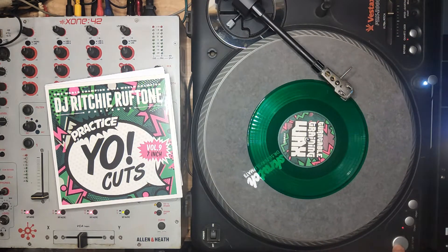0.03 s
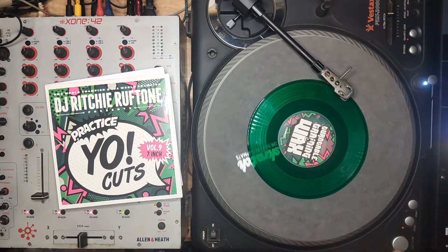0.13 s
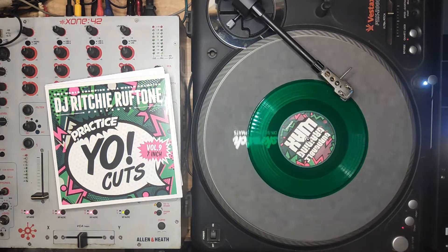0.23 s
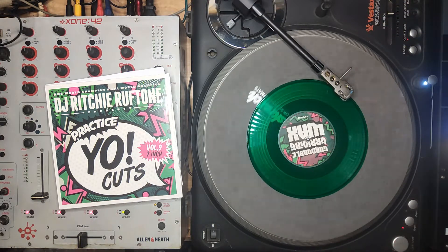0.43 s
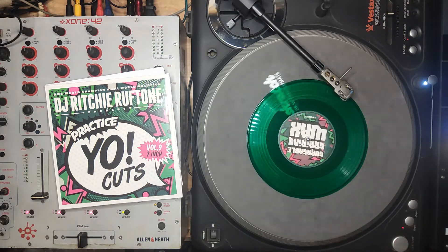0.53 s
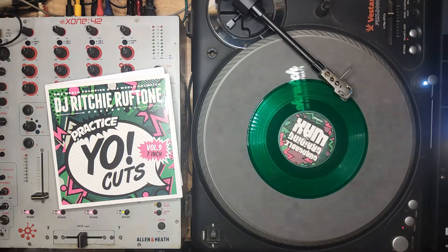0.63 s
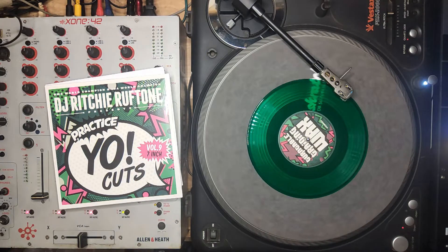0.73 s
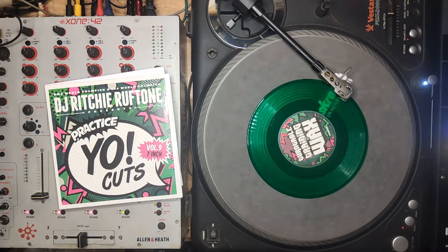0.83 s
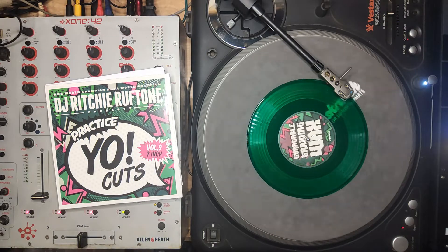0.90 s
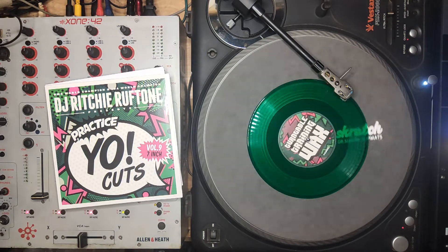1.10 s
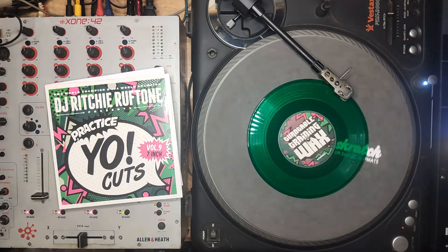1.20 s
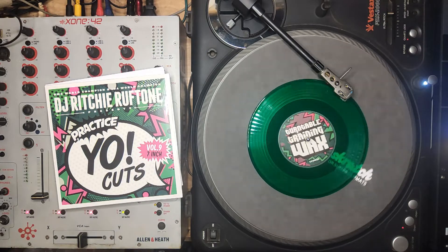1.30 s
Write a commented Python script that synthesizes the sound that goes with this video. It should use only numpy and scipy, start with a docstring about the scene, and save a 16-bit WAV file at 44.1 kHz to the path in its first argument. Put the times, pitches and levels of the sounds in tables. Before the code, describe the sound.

A turntable needle lands on a spinning vinyl record: a soft, low knock at 0.1 seconds, then one sharp, deep thump at 0.2, mostly on the left. Faint, patchy swishes follow on the right until about 1 second. Dust gives a dull pop at 0.4, a quick cluster of small ticks near 0.75 and another tick at 1.3. Quiet rumble and steady hum run underneath, heard straight from the pickup.

```python
"""On a turntable, a needle lands on a spinning vinyl record, heard straight from the pickup.
A soft knock shakes the deck, then the needle drops into the groove with one sharp, deep thump,
mostly on the left. The groove holds no music: there is low rumble and mains hum, worn patches
swish on the right wall, and a few specks of dust tick as they flick the needle."""
import sys
import numpy as np
from scipy.fft import rfft, irfft, next_fast_len
from scipy.io import wavfile

SR = 44100
rng = np.random.default_rng(int(sys.argv[2]) if len(sys.argv) > 2 else 0)


def generate_wav(sig):
    """Save sig (samples, or channels by samples) to the path in sys.argv[1] as 16-bit PCM at SR."""
    pcm = np.round(np.clip(np.atleast_2d(sig).T, -1, 1) * 32767).astype(np.int16)
    wavfile.write(sys.argv[1], SR, pcm)


N = 59535
T = np.arange(N) / SR
SIZE = next_fast_len(2 * N)   # extra room, so filter tails do not wrap around
HZ = np.arange(SIZE // 2 + 1) * SR / SIZE

# The needle's landing, left channel then right; gains are before filtering:
# (time [s], push gain [dB], snap gain [dB], crack gain [dB], treble cutoff [Hz], bass cutoff [Hz])
LANDING = [(0.20174, 45.5, 16.5, -17.5, 3126, 36), (0.20159, 39.5, -2, -26, 2500, 17)]


def from_db(db):
    """Turn decibels into a gain."""
    return 10 ** (np.asarray(db) / 20)


def gain_curve(points):
    """A gain that moves through (time [s], level [dB]) points."""
    return from_db(np.interp(T, *np.transpose(points)))


def low_pass(hz):
    """A gentle filter that keeps what is below hz; one minus it keeps what is above."""
    return 1 / (1 + 1j * HZ / hz)


def bass_delay(hz):
    """A filter that delays what is below hz and changes no levels."""
    return 1 - 2 * low_pass(hz)


def click(time, response):
    """One click, sent through a filter."""
    return irfft(response * np.exp(-2j * np.pi * HZ * time), SIZE)[:N]


def noise(spectrum):
    """Noise shaped by (frequency [Hz], level [dB per Hz]) points."""
    hz, db = np.transpose(spectrum)
    gain = from_db(np.interp(np.log(HZ + 1), np.log(hz), db)) * np.sqrt(SR / 2)
    return irfft(rfft(rng.standard_normal(SIZE)) * gain, SIZE)[:N]


def pickup(sideways, vertical):
    """Sideways needle motion reaches both channels alike, vertical motion with opposite signs."""
    return np.array([sideways + vertical, sideways - vertical])


def hum():
    """The mains and the motor add steady low tones."""
    # Hum tones: (frequency [Hz], sideways level [dB rms], vertical level [dB rms])
    tones = [(53.6, -59, -56.5), (101.8, -67.5, -66.5), (188, -86, -80), (308, -91, -88)]
    out = 0
    for hz, sideways_db, vertical_db in tones:
        angle = 2 * np.pi * (hz * T + rng.random())
        out += pickup(from_db(sideways_db) * np.sin(angle), from_db(vertical_db) * np.cos(angle))
    return np.sqrt(2) * out


def groove():
    """The groove rumbles, mostly up and down, and hisses faintly; a dull rush comes before the thump."""
    # Tone colour of each noise: (frequency [Hz], level [dB per Hz])
    sideways = [(10, -69.5), (25, -81.5), (60, -91), (95, -89.5), (140, -99), (250, -97.5), (400, -109),
                (700, -117), (1500, -119), (3000, -119), (7000, -120), (15000, -122)]
    vertical = [(10, -63.5), (25, -76), (60, -81.5), (95, -81), (140, -86), (250, -83), (400, -92.5),
                (700, -102), (1500, -109), (3000, -114), (7000, -117), (15000, -119)]
    rush = [(20, -55.5), (110, -74), (200, -89.5), (700, -94.5), (2000, -103), (4000, -111), (8000, -122),
            (15000, -131)]
    # How those levels rise and fall: (time [s], gain [dB])
    rumble_swell = [(0, -17.5), (.19, -7.5), (.21, -3), (.35, 1), (.6, 2), (.78, -3.5), (.88, -0.5),
                    (1.02, -0.5), (1.22, -4), (1.35, -1.5)]
    rush_swell = [(0, -2), (.07, -9.5), (.15, -1), (.2, -4), (.27, -23)]
    rumble = gain_curve(rumble_swell) * pickup(noise(sideways), noise(vertical))
    return rumble + gain_curve(rush_swell) * noise(rush)


def worn_groove():
    """Scuffed patches pass under the needle and hiss unevenly, mostly on the right wall."""
    # Worn patches: (start [s], end [s], level [dB])
    patches = [(0.215, 0.244, -54.5), (0.341, 0.412, -62), (0.498, 0.486, -61), (0.529, 0.57, -52),
               (0.681, 0.701, -59.5), (0.828, .87, -57), (0.889, 0.906, -54.5), (0.943, 0.964, -56.5),
               (1.291, 1.36, -63.5)]
    # Tone colour of their hiss: (frequency [Hz], relative level [dB])
    colour = [(30, 9), (100, 2), (200, -5), (500, 0), (1500, -1), (4000, -2.5), (8000, -5), (15000, -4.5)]
    rise_s, fall_s, flutter_hz, flutter_db, left_db = 0.014, 0.013, 111, 2.41, -15.5
    swell = 0
    for start, end, db in patches:
        fade = np.maximum(start - T, 0) / rise_s + np.maximum(T - end, 0) / fall_s
        swell += from_db(db) * np.exp(-fade)
    flutter = irfft(rfft(rng.standard_normal(SIZE)) * low_pass(flutter_hz) ** 2, SIZE)[:N]
    left, right = noise(colour), noise(colour)
    hiss = np.array([from_db(left_db) * left / left.std(), right / right.std()])
    return swell * from_db(flutter_db * flutter / flutter.std()) * hiss


def dust():
    """Each speck of dust flicks the needle out and back."""
    # Specks: (time [s], left gain [dB], right gain [dB], treble cutoff [Hz], bass cutoff [Hz])
    specks = [(.3972, -6, -29.5, 300.7, 30), (0.4127, -30.5, -30, 14300, 1980),
              (0.6332, -46, -43, 9000, 1000), (.7410, -28.5, -26.5, 15000, 900),
              (0.7451, -27, -30.5, 15600, 940), (0.7485, -41, -30, 15200, 930),
              (.7528, -29, -28.5, 15100, 910), (1.153, -36, -34.5, 494, 250),
              (1.3148, -29.5, -35.5, 1500, 600)]
    out = 0
    for time, left_db, right_db, treble_hz, bass_hz in specks:
        band = low_pass(treble_hz) * low_pass(hz=14500) * (1 - low_pass(bass_hz))
        out += from_db([[left_db], [right_db]]) * click(time, band * bass_delay(hz=3500))
    return out


def deck_ring(time):
    """After a blow, the deck rings under the needle with a few low, fading tones."""
    # Deck tones: (frequency [Hz], vertical level [dB], sideways level [dB], time to fade by 60 dB [s])
    tones = [(48.2, -31.5, -50.5, 0.38), (87, -22.5, -41.5, 0.42), (126, -27, -34.5, 0.23),
             (165, -54, -46.5, 0.85), (253, -41, -27.5, .08), (364, -61, -46, 0.15), (404, -51.5, -62, .2)]
    contact_s = 0.01
    age = np.maximum(T - time, 0)
    attack = 1 - np.exp(-(age / contact_s) ** 2)
    out = 0
    for hz, vertical_db, sideways_db, fade_s in tones:
        tone = np.sin(2 * np.pi * hz * age) * from_db(-60 * age / fade_s)
        out += pickup(from_db(sideways_db) * tone, -from_db(vertical_db) * tone)
    return attack * out


def deck_knock():
    """A soft blow swings the deck once, mostly up and down, and leaves it ringing."""
    peak_s, width_s, sideways_lag_s, swing_hz = 0.09, 0.0031, 0.0047, 92
    age = T - peak_s - np.array([[sideways_lag_s], [0]])
    swell = from_db(-14) * np.exp(-.5 * (age / width_s) ** 2)
    sideways, vertical = swell * np.cos(2 * np.pi * swing_hz * age)
    return pickup(from_db(-22) * sideways, -vertical) + deck_ring(time=.0835)


def thump():
    """The needle lands: a sudden push with a snap and a crack. The arm bobs and the bass trails behind."""
    arm_hz, arm_q = 12.5, 1.7   # the arm bounces on the needle's springy mount; higher q bobs longer
    ratio = 1j * HZ / arm_hz
    arm = ratio ** 2 / (1 + ratio / arm_q + ratio ** 2)
    path = arm * bass_delay(hz=385) * bass_delay(hz=23)
    channels = []
    for time, push_db, snap_db, crack_db, treble_hz, bass_hz in LANDING:
        contact, bass = low_pass(treble_hz), low_pass(bass_hz)
        push = from_db(push_db) * bass
        snap = from_db(snap_db) * contact
        blow = (push + snap) * contact ** 3 + from_db(crack_db)
        channels.append(click(time, blow * (1 - bass) * path))
    return np.array(channels)


def scene():
    """All that the pickup gives out; the worn patches are heard only after the needle has landed."""
    landed_s = LANDING[0][0]
    landing = thump() + from_db(-10) * deck_ring(landed_s)
    return deck_knock() + landing + (T > landed_s) * worn_groove() + dust() + groove() + hum()


def record(dry):
    """A steep filter removes the highest treble."""
    cutoff_hz = 15800
    return irfft(rfft(dry, SIZE) / np.sqrt(1 + (HZ / cutoff_hz) ** 120), SIZE)[:, :N]


dry = scene()
out = record(dry)
generate_wav(out)
```